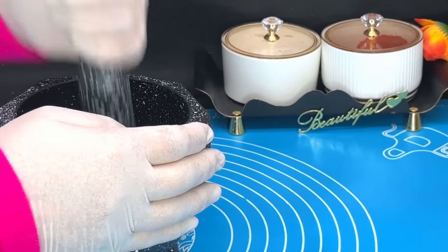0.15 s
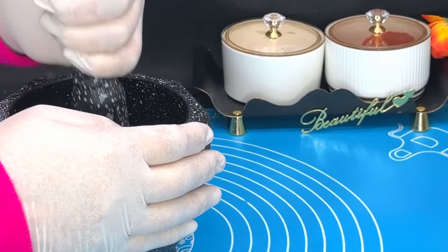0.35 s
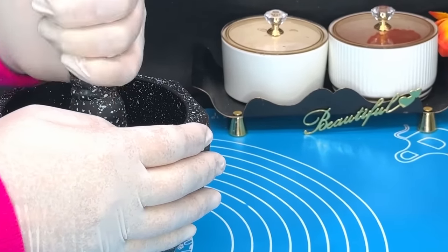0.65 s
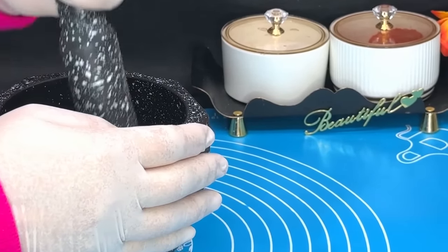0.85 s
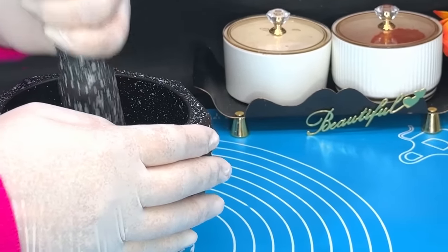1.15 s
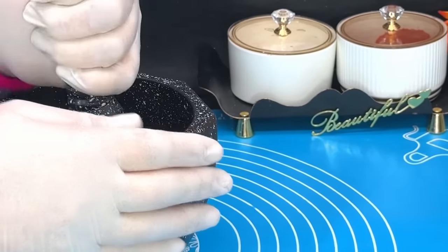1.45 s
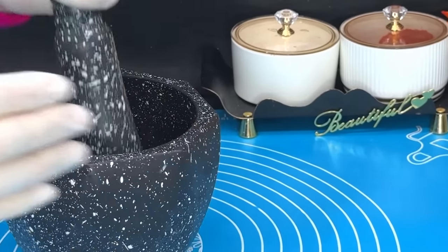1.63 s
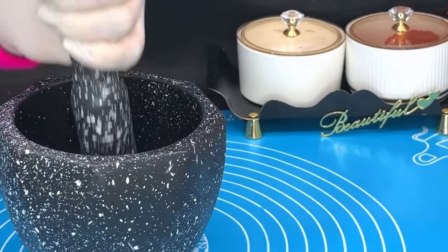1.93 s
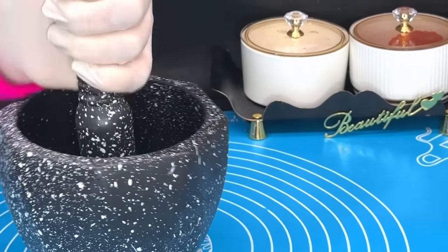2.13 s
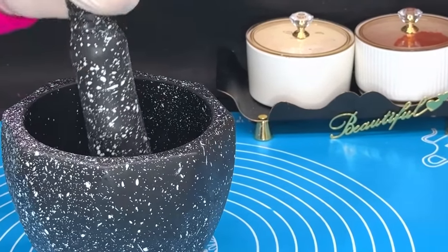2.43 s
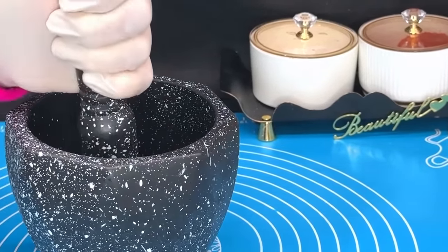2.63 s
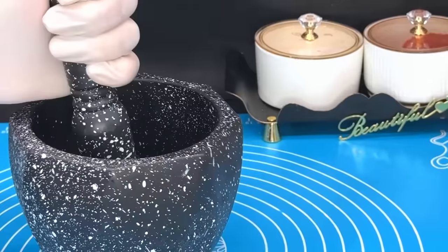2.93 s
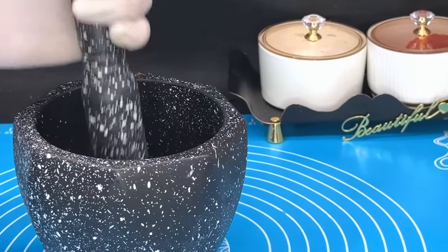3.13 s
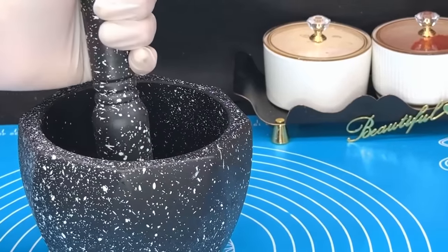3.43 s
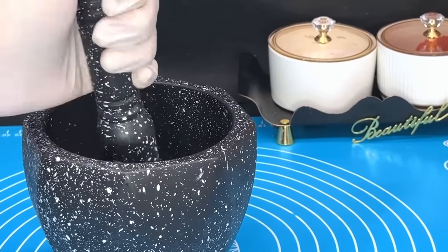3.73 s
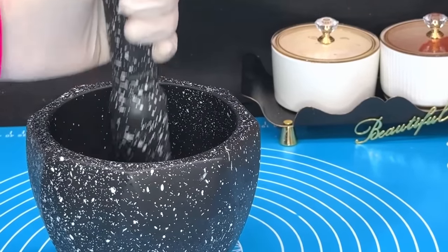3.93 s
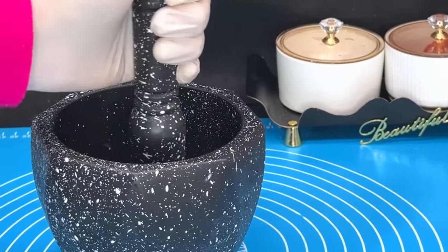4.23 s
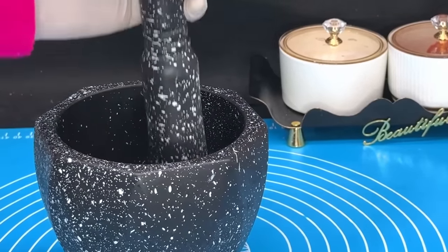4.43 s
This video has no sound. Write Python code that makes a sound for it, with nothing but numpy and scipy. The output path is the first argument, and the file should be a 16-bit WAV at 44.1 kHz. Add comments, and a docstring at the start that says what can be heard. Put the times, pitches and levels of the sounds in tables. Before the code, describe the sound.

Steady dull mortar-and-pestle blows, each a wet crunch and low thud with short kitchen echo, starting firm and growing softer and more muffled.

```python
"""On a kitchen counter, a stone pestle pounds wet ginger, garlic and spices in a heavy mortar.
Each stroke crushes pulp, a swelling burst of noise, and lands: decaying modes of counter and bowl boom,
the pestle clacks just after, and the kitchen rings on in random echoes. Small rebounds, ticks and spits
of juice and grit fill the gaps. A close pair of microphone ports hears it over a faint low house hum."""
import sys
import numpy as np
from scipy import signal
from scipy.fft import rfft, irfft, next_fast_len
from scipy.io import wavfile
from scipy.ndimage import uniform_filter1d

SR = 44100
rng = np.random.default_rng(int(sys.argv[2]) if len(sys.argv) > 2 else 0)


def invert_db(level):
    """Linear amplitude ratio for a level in decibels (20 dB per decade), elementwise."""
    return 10 ** (np.asarray(level, dtype=float) / 20)


def unload_wav(signal):
    """Save mono or channel-first audio to the path in sys.argv[1] as 16-bit WAV at rate SR, clipped to [-1, 1]."""
    wavfile.write(
        sys.argv[1],
        SR,
        np.round(np.clip(np.atleast_2d(signal).T, -1, 1) * 32767).astype(np.int16),
    )


N = 201753
LEAD = SR // 3  # samples of the scene before time zero
PATHS = 4  # separate ways into the room
STONE_MS = 3.1  # contacts longer than this are cushioned by pulp


def read(points, hz):
    """Value of a (hz, value) table at hz, interpolated over log frequency."""
    table_hz, value = np.transpose(points)
    return np.interp(np.log(hz + 1), np.log(table_hz + 1), value)


def colour(x, gain):
    """Multiplies the spectrum of x by gain(hz)."""
    size = next_fast_len(x.shape[-1] + 2048)
    spectrum = rfft(x, size) * gain(np.fft.rfftfreq(size, 1 / SR))
    return irfft(spectrum, size)[..., :x.shape[-1]]


def add(mix, start_s, sound):
    """Mixes a sound in at start_s."""
    part = mix[round(start_s * SR) + LEAD:][:len(sound)]
    part += sound[:len(part)]


# The pestle lands: start_s, force_db, contact_ms, boom_db, bowl_db
BLOWS = [(-.19, -10, 2.4, 4.5, 2), (.190, -11, 4.26, 2.5, 1), (.597, -17, 5.8, -6.5, -2),
         (.977, -8, 3.11, -1.5, 4.5), (1.350, -4.5, 2.78, -2.5, 3.5), (1.755, -7.5, 1.32, -2.5, 1),
         (2.146, -6.5, 2.06, 0.5, 2.2), (2.53, -14, 4.42, 0, -0.3), (2.920, -14, 3.73, -0.3, -0.5),
         (3.335, -19, 8.5, 1.3, -1.5), (3.720, -12.5, 8.4, -9, -9), (4.132, -11.5, 1.24, -1, 0.3),
         (4.525, -13.5, 4.4, -21, -11.5)]
# The pestle hops and touches down again: start_s, force_db, contact_ms, crunch_db, crunch_lower_edge_hz
REBOUNDS = [(0.242, -30.5, 2.2, -35.5, 1500), (.650, -36, 2.3, -42, 1500), (1.811, -24, 1.42, -33.5, 4900),
            (2.204, -27.5, 2.3, -33.5, 4310), (2.585, -36, 3.1, -49, 900), (3.768, -37.5, 5.5, -84, 1700)]


def landings():
    """Rows start_s, force_db, contact_ms, boom_db, bowl_db, clack_db: pulp and weak blows mute the clack."""
    clack_db, clack_db_per_ms = 3, -13.5  # bare clack, and its change per ms of cushion
    firm_db, clack_steep = -8, 2.1  # below this force the clack loses this many more dB per dB
    rebound_bowl_db, rebound_clack_db = 0.8, -10
    rows = []
    for start_s, force_db, contact_ms, boom_db, bowl_db in BLOWS:
        muted_db = clack_db_per_ms * max(contact_ms - STONE_MS, 0)
        weak_db = clack_steep * min(force_db - firm_db, 0)
        rows.append((start_s, force_db, contact_ms, boom_db, bowl_db, clack_db + muted_db + weak_db))
    for start_s, force_db, contact_ms, _, _ in REBOUNDS:
        rows.append((start_s, force_db, contact_ms, 0, rebound_bowl_db, rebound_clack_db))
    return rows


def ring(modes, swell_cycles=.15):
    """Each mode after one sharp push, dying exponentially; neighbours start in opposite sense."""
    t = np.arange(SR // 2) / SR
    hz, db, t60_s = np.transpose(modes)[:, :, None]
    sense = (-1.) ** np.arange(len(modes))[:, None]
    swell = 1 - np.exp(-t * hz / swell_cycles)  # a big part needs some of a cycle to get moving
    return sense * swell * invert_db(db - 60 * t / t60_s) * np.sin(2 * np.pi * hz * t)


# Slow modes of the whole counter on its frame, before each blow's boom_db: pitch_hz, level_db, t60_s
FRAME = [(51.8, -9.5, 0.39), (80.6, -3.5, 0.19), (100.2, -14, 0.41), (126.06, -8.5, 0.47)]
# Modes of the counter top and the air of the kitchen: pitch_hz, level_db, t60_s
COUNTER = [(154.3, -9, 0.4), (168, -24.5, 0.04), (182.3, -7.5, 0.27), (203.8, -15.5, 0.46),
           (235.2, -13, 0.37), (264.1, -14.5, 0.5), (290.5, -17, 0.31)]
# Modes of the bowl on its mat, before each blow's bowl_db: pitch_hz, level_db, t60_s
BOWL = [(304.4, -11, 0.17), (348.8, -4, 0.19), (419.6, -11, 0.11), (477, -4, 0.14), (550, 11.5, 0.015),
        (569, -14.5, 0.39), (638, 2.5, 0.13), (782.2, 2, 0.12), (850, -4, 0.11), (1100, -12.5, .012)]
# Modes of the pestle, which knocks the bowl wall just after landing: pitch_hz, level_db, t60_s
PESTLE = [(953, -19, 0.011), (1280, -16.5, 0.0045), (1340, -19, 0.029), (1743, -13, 0.017),
          (2000, -21, 0.024), (2280, -13, 0.015), (2835, -22, 0.011)]
# Shape of the broad knock that the bowl throws up into the room: pitch_hz, level_db
KNOCK = [(80, -33), (180, -5), (350, 8), (640, 4.5), (800, 4.5), (1100, -5.5), (1750, -7), (2400, -4),
         (3500, -12.5), (7000, -33.5)]


def pounding(spot_db=3.5):
    """Rings heard directly and knocks sent to the room; a longer contact leaves the high modes asleep."""
    clack_lag_s, knock_db = 0.010, 31
    clack_echo_db, body_echo_db = 0.5, -16  # what the room gets of the pestle and of counter and bowl
    lift_s, lift_db = 0.19, -11.5  # the pestle lifts this long after landing, and the ring drops by this
    damp_db_per_s_ms = -13  # pulp under the pestle damps the ring: dB per s for each ms of cushion
    near = np.zeros(N + LEAD)
    knocks, sent = np.zeros((2, PATHS, N + LEAD))
    body = ring(FRAME + COUNTER + BOWL)
    pestle = ring(PESTLE).sum(0)
    t = np.arange(body.shape[1]) / SR
    lifted = invert_db(lift_db / (1 + np.exp((lift_s - t) / 0.0033)))
    rows = landings()
    spots = spot_db * rng.standard_normal((len(rows), len(body)))  # the landing spot reweights the modes
    for k, (start_s, force_db, contact_ms, boom_db, bowl_db, clack_db) in enumerate(rows):
        u = np.arange(SR // 40) / SR * 1000 / contact_ms
        push = u ** 2 * np.exp(-2 * np.pi * u)
        push *= invert_db(force_db) / push.sum()
        damped = invert_db(damp_db_per_s_ms * max(contact_ms - STONE_MS, 0) * t)
        group_db = np.repeat([boom_db, 0, bowl_db], [len(FRAME), len(COUNTER), len(BOWL)])
        struck = invert_db(group_db + spots[k]) @ body
        thud = signal.oaconvolve(push, struck * lifted * damped)
        clack = invert_db(force_db + clack_db) * pestle
        add(near, start_s, thud)
        add(near, start_s + clack_lag_s, clack)
        path = k % PATHS
        add(knocks[path], start_s, invert_db(bowl_db) * push)
        add(sent[path], start_s, invert_db(body_echo_db) * thud)
        add(sent[path], start_s, invert_db(clack_echo_db) * clack)
    return near, sent + colour(knocks, lambda hz: invert_db(knock_db + read(KNOCK, hz)))


# Pulp crushed under each blow, in the order of BLOWS:
# peak_s, peak_rms_db, rise_ms, tilt_db_per_octave, level_db of the slide before it
CRUNCHES = [(-.19, -22, 2.3, .6, -58), (.186, -24.5, 2.9, -0.1, -68), (.593, -29, 2.4, 2.6, -63.5),
            (.979, -25.5, 2.7, -1.2, -67.5), (1.350, -22, 1.75, -2, -65), (1.755, -21.5, 2.16, -4.5, -62.5),
            (2.147, -23.5, 1.6, -2, -48), (2.527, -22, 2.15, -1.5, -64.5), (2.921, -27.5, 4.5, -0.7, -58.5),
            (3.335, -42.5, 7, 0.9, -70.5), (3.715, -35.5, 3, 2, -64.5), (4.132, -33, 7.7, -1.3, -63.5),
            (4.525, -37, 5.2, 1.1, -72)]
# Juice and grit spit between the blows: peak_s, peak_rms_db, length_ms, lower_edge_hz
SPITS = [(.09, -61.5, 11, 5000), (.277, -47, 6, 2000), (.336, -45.5, 6.8, 5000), (0.397, -52, 23, 4550),
         (0.438, -54, 5.6, 5000), (.732, -44.5, 8.4, 5200), (0.787, -47, 3, 5500), (1.066, -43, 6.1, 4470),
         (2.282, -52, 4.2, 4900), (3.189, -63, 4.6, 2500), (3.318, -40.5, 11.3, 2600),
         (3.486, -59.5, 8.3, 3470), (3.903, -62, 6.8, 4570), (4.289, -57, 23.6, 4500)]
# Earliest and latest random tick after the peak of a crunch: early_s, late_s
GRIT_S = (.03, .3)


def bursts(count=7):
    """Rows peak_s, level_db, rise_ms, length_ms, tilt_db_per_octave, lower_edge_hz for all crushed pulp."""
    crunch_ms, crunch_ms_per_ms = 10.7, 0.66  # length of the crunch, longer per ms of cushion
    bare_edge_hz, cushion_edge_hz, edge_ms = 730, 2070, .6  # the edge climbs over this much cushion
    slide_ms, slide_tilt_db, slide_edge_hz = 31, -2, 940  # the pestle slides in before it lands
    hop_rise_ms, hop_ms, hop_tilt_db = 3.2, 8.9, -3  # crunch of a rebound
    spit_rise, spit_tilt_db = 0.2, 1.5  # rise as a share of the length
    grit_db, grit_db_per_s, grit_spread_db = -16.5, -96, 7  # ticks, relative to their crunch
    grit_ms, grit_edge_hz = 2.8, 3000
    rows = []
    chances = rng.random((len(BLOWS), count, 2))
    for blow, crunch, draws in zip(BLOWS, CRUNCHES, chances):
        peak_s, db, rise_ms, tilt_db, slide_db = crunch
        cushion_ms = max(blow[2] - STONE_MS, 0)
        edge_hz = bare_edge_hz + (cushion_edge_hz - bare_edge_hz) * min(cushion_ms / edge_ms, 1)
        length_ms = crunch_ms + crunch_ms_per_ms * cushion_ms
        rows.append((peak_s, db, rise_ms, length_ms, tilt_db, edge_hz))
        rows.append((peak_s, slide_db, slide_ms, crunch_ms, slide_tilt_db, slide_edge_hz))
        for when, size in draws:
            late_s = GRIT_S[0] + (GRIT_S[1] - GRIT_S[0]) * when
            tick_db = db + grit_db + grit_db_per_s * late_s - grit_spread_db * size
            tick_s = min(peak_s + late_s, N / SR)
            rows.append((tick_s, tick_db, spit_rise * grit_ms, grit_ms, spit_tilt_db, grit_edge_hz))
    for start_s, _, _, db, edge_hz in REBOUNDS:
        rows.append((start_s, db, hop_rise_ms, hop_ms, hop_tilt_db, edge_hz))
    for peak_s, db, length_ms, edge_hz in SPITS:
        rows.append((peak_s, db, spit_rise * length_ms, length_ms, spit_tilt_db, edge_hz))
    return rows


# Spectrum of crushed pulp before each burst's tilt and lower edge: pitch_hz, level_db
PULP = [(300, -6), (900, 3), (2000, -6.5), (3100, 0.5), (4300, -5.5), (5600, -4.5), (7200, -3),
        (10000, -7.5), (13500, -13.5), (15800, -13.5), (16600, -28.5)]
# Air in the bowl, stirred by the crunch, a single row: pitch_hz, width_hz, level_db
CAVITY = (720, 240, -15.5)


def crushing(grain_db=1.5, grain_size=12, flat_top=1.6):
    """Bursts of dense tiny ruptures of uneven size; each burst swells, holds and stops."""
    out = np.zeros(N + LEAD)
    t_ms = np.arange(-SR // 10, SR // 10) / SR * 1000
    rows = bursts()
    ruptures = rng.standard_normal((len(rows), len(t_ms)))
    sizes = rng.exponential(1, (len(rows), len(t_ms) // grain_size + 1))
    sizes = np.repeat(sizes, grain_size, axis=1)[:, :len(t_ms)]
    ruptures *= invert_db(grain_db * (sizes - 1))
    cavity_hz, width_hz, cavity_db = CAVITY
    for (peak_s, db, rise_ms, length_ms, tilt_db, edge_hz), burst in zip(rows, ruptures):
        def pulp_and_air(hz):
            tilted = invert_db(read(PULP, hz) + tilt_db * np.log2((hz + 50) / 4500))
            pulp = tilted / np.sqrt(1 + (edge_hz / (hz + 1)) ** 6)
            return pulp + invert_db(cavity_db) / (1 + (2 * (hz - cavity_hz) / width_hz) ** 4)

        burst = colour(burst, pulp_and_air)
        swell = np.exp(np.where(t_ms < 0, t_ms / rise_ms, -abs(t_ms / length_ms) ** flat_top))
        add(out, peak_s + t_ms[0] / 1000, invert_db(db) * burst / burst.std() * swell)
    return out


def take_turns(x, turn_ms=18.):
    """Shares a sound among the paths into the room in regular overlapping turns, to even the echoes' tone."""
    turns = np.arange(len(x)) / SR * 1000 / turn_ms - np.arange(PATHS)[:, None] / PATHS
    from_turn = np.clip((turns + .5) % 1 - .5, -1 / PATHS, 1 / PATHS)
    return x * np.maximum(np.cos(np.pi * PATHS / 2 * from_turn), 0)


# Left-right likeness of the echoes and the hum: pitch_hz, likeness (1 = identical)
SAME = [(60, 1), (130, .2), (250, 0.81), (700, 0.24), (1100, 0.41), (1600, 0.33), (2100, 1), (4000, .9),
        (7200, 1), (9000, 1), (16000, 0.49)]


def pair(left, other):
    """Two channels whose likeness depends on frequency: the right mixes the left with another signal."""
    def same(hz):
        return np.clip(read(SAME, hz), -1, 1)

    right = colour(left, same) + colour(other, lambda hz: np.sqrt(1 - same(hz) ** 2))
    return np.array([left, right])


# Decay of the kitchen's echoes: pitch_hz, t60_s
KITCHEN_T60 = [(150, 0.5), (400, 0.42), (1040, 0.46), (2760, 0.52), (7280, 0.38)]
# Tone of the kitchen's echoes: pitch_hz, level_db
KITCHEN_DB = [(100, -19), (300, 4.5), (700, 7), (1500, -2), (3000, -9), (7000, -6), (14000, -8.5)]


def kitchen(x, first_ms=7):
    """Separate echoes of random sign and delay, each band dying at its own speed."""
    taps = np.zeros((2, SR))
    at = np.arange(round(first_ms * SR / 1000), SR - 16, 16)
    at = at + rng.integers(0, 16, (2, len(at)))  # one echo in every 16 samples
    np.put_along_axis(taps, at, rng.choice([-1., 1.], at.shape), 1)
    hz, t, z = signal.stft(pair(*taps), SR, nperseg=256)
    z = z * invert_db(-60 * t / read(KITCHEN_T60, hz)[:, None])
    left_energy = (abs(z[0]) ** 2).sum(1).mean()
    z *= invert_db(read(KITCHEN_DB, hz))[:, None] / np.sqrt(left_energy) / 128
    echoes = signal.istft(z, SR, nperseg=256)[1]
    return signal.fftconvolve(x[None], echoes, axes=1)[:, :len(x)]


# Spectrum of the house hum with its trace of hiss, relative: pitch_hz, level_db per Hz
HUM = [(25, -18), (50, 5), (100, 1.5), (170, -12), (300, -20), (600, -31), (1200, -42.5), (3000, -35.5),
       (8000, -37.5), (16000, -55.5)]


def house(waver_db=4.5):
    """Faint low hum, coloured noise whose level wavers, with a trace of hiss."""
    hum_db = -64  # rms before the waver
    hum = colour(pair(*rng.standard_normal((2, N))), lambda hz: invert_db(read(HUM, hz)))
    waver = uniform_filter1d(rng.standard_normal(N), SR // 12)
    return invert_db(hum_db + waver_db * waver / waver.std()) * hum / hum.std()


def scene():
    """Direct sound, its echoes and the hum."""
    rings, knocks = pounding()
    crunch = crushing()
    echoes = sum(kitchen(path) for path in knocks + take_turns(crunch))
    return (rings + crunch + echoes)[:, LEAD:] + house()


# Phase by which the left port leads: pitch_hz, lead_radians
PORTS = [(2200, 0), (3200, -.65), (5500, -.33), (7300, 0), (7700, -.3), (8400, -2.9), (9300, -3.1),
         (10500, -.6), (11300, 0), (13350, 3.14), (14500, 4.6), (15500, 6.28)]
# Level of the left port over the right: pitch_hz, level_db
LEFT_DB = [(60, -.4), (200, -1.6), (400, .8), (900, -1.5), (2500, -.2), (15000, .1)]


def microphone(dry):
    """The microphone cuts the deep bass; its two close ports differ in phase and a little in level."""
    low_cut = signal.butter(4, 52.5, "high", fs=SR, output="sos")  # Hz
    left, right = signal.sosfilt(low_cut, dry)

    def port(share):
        def gain(hz):
            return invert_db(share * read(LEFT_DB, hz) / 2) * np.exp(share * .5j * read(PORTS, hz))
        return gain

    # the halved shares add up to the whole difference between the ports
    return np.array([colour(left, port(0.85)), colour(right, port(-1.15))])


def band_limit(x):
    """A steep low-pass at the top of the band."""
    return signal.sosfilt(signal.butter(12, 16820, fs=SR, output="sos"), x)


def record(dry):
    """The scene as the close pair of microphone ports hears it."""
    mix = microphone(dry)
    return band_limit(mix)


dry = scene()
out = record(dry)
unload_wav(out)
```